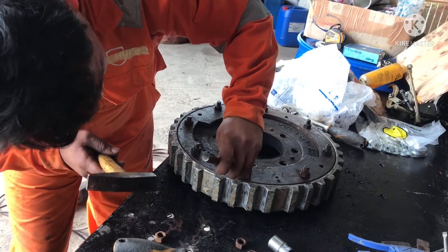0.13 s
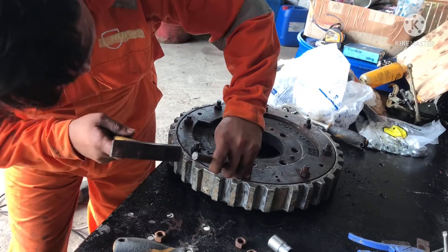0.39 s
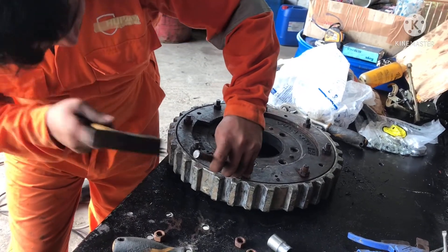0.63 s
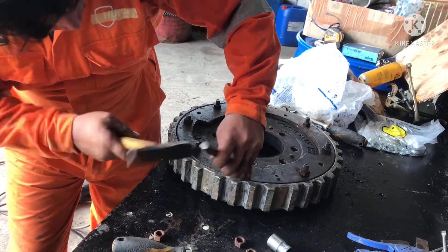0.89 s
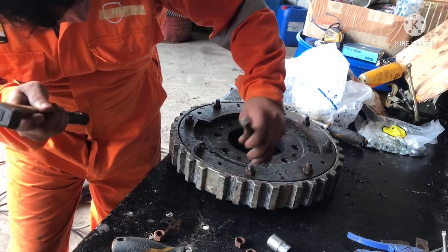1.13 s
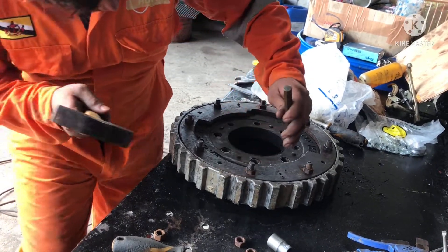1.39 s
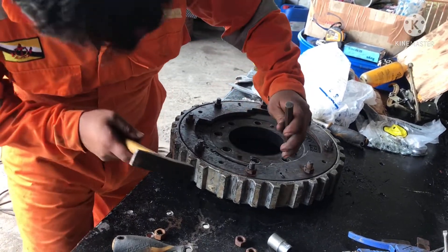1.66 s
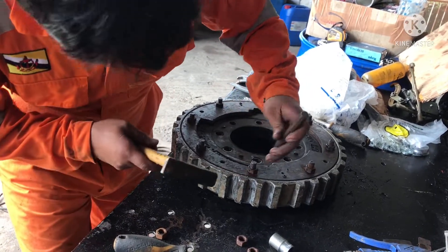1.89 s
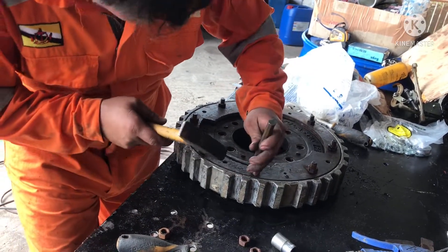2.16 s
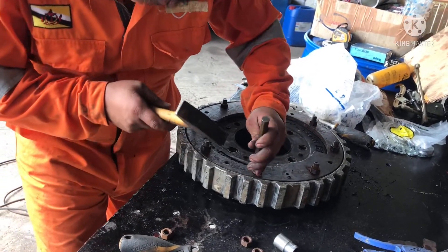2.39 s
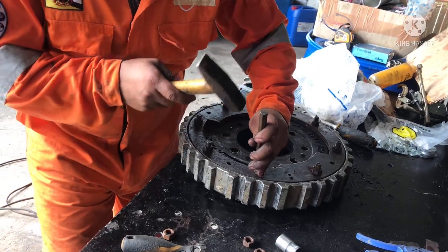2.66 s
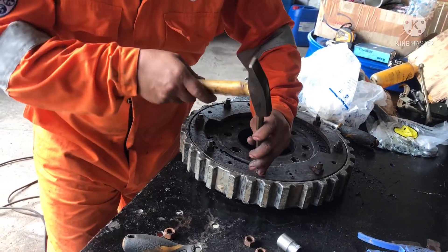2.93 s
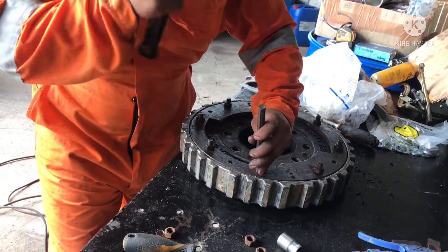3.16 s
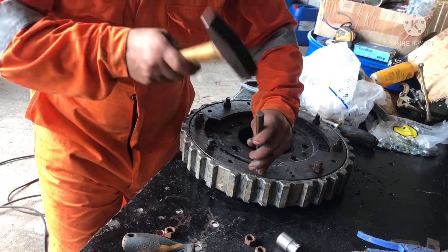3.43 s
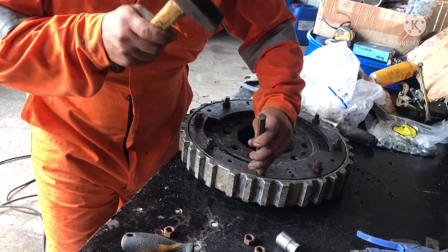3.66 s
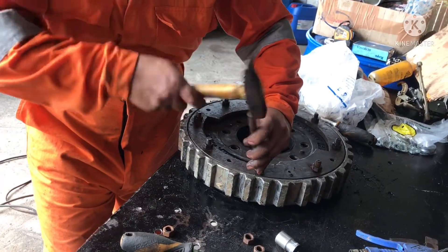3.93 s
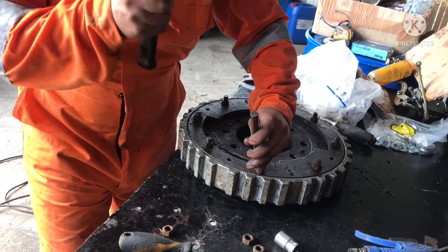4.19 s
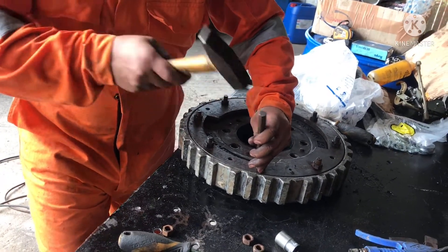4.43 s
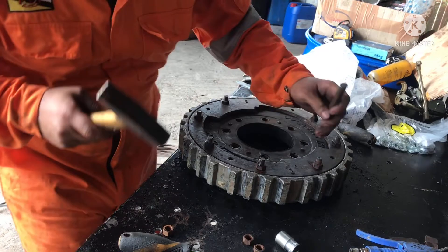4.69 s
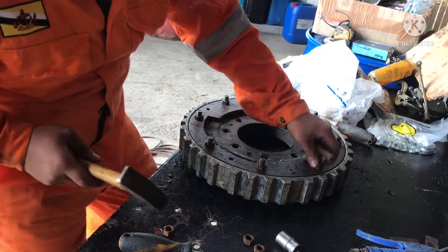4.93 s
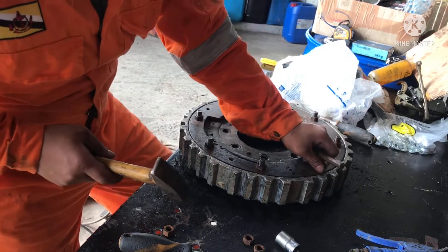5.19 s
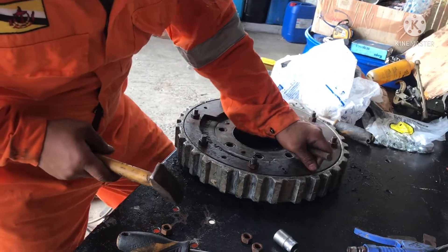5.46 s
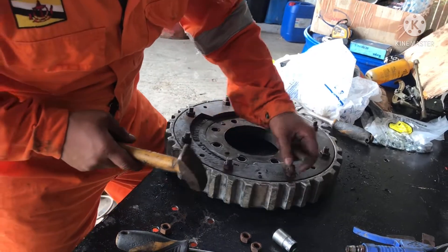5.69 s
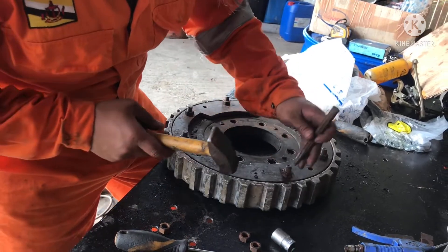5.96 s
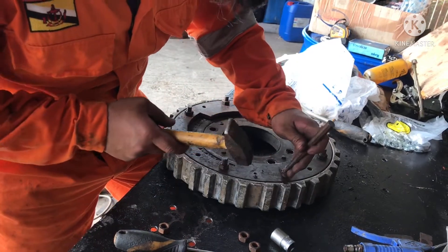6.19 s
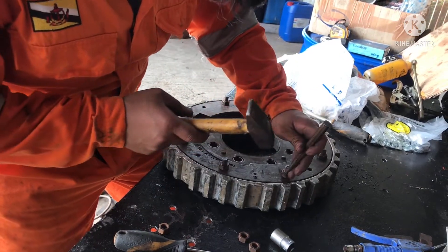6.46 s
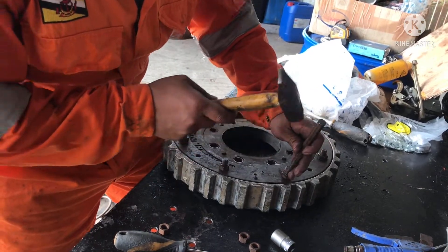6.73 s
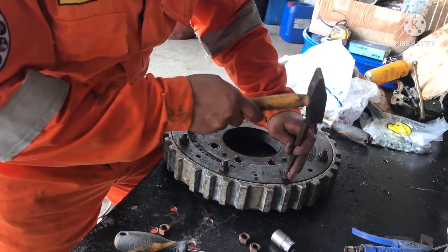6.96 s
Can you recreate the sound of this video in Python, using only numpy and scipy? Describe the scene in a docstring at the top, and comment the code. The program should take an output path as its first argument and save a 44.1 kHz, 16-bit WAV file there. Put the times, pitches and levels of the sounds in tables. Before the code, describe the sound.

Close hammering on steel in an open workshop with quick echoes and a tail of about half a second. Soft tool and cloth brushes come first, with a faint buzzy bird note and slurred whistle. At 0.5 s a light, bright tap; at 0.9 s a hard crack with a short clang, high ping and low bench thud. Small brushes near 1.5 s and 2.3 s, faint falling chirps at 1.9 and 2.7. A light tap at 3.0 leads to very loud, clipped blows at 3.3, 4.0 and 4.3 s. From 5.35 to about 5.8 the gear is dragged, knocking and rumbling; the bird call repeats. Faint chirps, short far tones and tiny ticks follow, then a light tap at 7.0. Low yard hum continues, with a distant engine throb strongest before 2 s, and barely audible whine and insects.

```python
"""A hammer strikes a steel punch set on a heavy gear lying on a steel bench: light aiming taps and hard blows.
Each blow is shaped noise (crack, clang) plus dying modes of punch, gear and bench; the loudest ones clip.
Between blows the gear is dragged round, random slips knocking the bench modes, and tools and cloth brush steel.
Sparse echoes and a banded tail answer as the open workshop; outside, gliding tones make bird calls and
far tones, and filtered noise makes yard hum, a distant engine, a whine and insects."""
import sys
import numpy as np
from scipy import signal
from scipy.fft import rfft, irfft
from scipy.io import wavfile
from scipy.ndimage import uniform_filter1d

SR = 44100
rng = np.random.default_rng(int(sys.argv[2]) if len(sys.argv) > 2 else 0)


def log_audio(samples):
    """Write samples as a 16-bit WAV file to the path given in sys.argv[1]."""
    # one column per channel
    frames = np.atleast_2d(samples).T
    # limit to full scale, then quantise
    limited = np.clip(frames, -1, 1)
    pcm = np.round(limited * 32767).astype(np.int16)
    wavfile.write(sys.argv[1], SR, pcm)


def gain_from_db(level_db):
    """Convert decibel levels to linear amplitude factors (20 dB per decade)."""
    decades = np.asarray(level_db, float) / 20
    return 10 ** decades


N = 312669


def evened(x):
    """Scales to rms 1."""
    return x / np.sqrt(np.mean(x ** 2) + 1e-20)


def read(points, hz):
    """Reads a curve on a log-frequency axis."""
    point_hz, value = np.transpose(points)
    return np.interp(np.log(hz + 1), np.log(point_hz + 1), value)


def add(mix, start_s, sound):
    """Adds a sound at a time, cut at the end of the mix."""
    part = mix[round(start_s * SR):][:len(sound)]
    part += sound[:len(part)]


def coloured(x, db_of_hz):
    """Filters a signal by a gain rule, rms 1."""
    gain = gain_from_db(db_of_hz(np.fft.rfftfreq(len(x), 1 / SR)))
    return evened(irfft(rfft(x) * gain, len(x)))


def ring(t, hz, t60, db, rise_s):
    """Sum of dying modes with a soft start; neighbours swing in opposite sense."""
    hz, t60, db = (np.reshape(c, (-1, 1)) for c in (hz, t60, db))
    sense = (-1.) ** np.arange(len(hz))[:, None]
    modes = sense * gain_from_db(db - 60 * t / t60) * np.sin(2 * np.pi * hz * t)
    return modes.sum(0) * (1 - np.exp(-t / rise_s))


# blows: start_s, strength_db, bright_db_per_octave, thud_db, low_punch_db, high_punch_db
BLOWS = [(0.5409, -21.5, 2, -6, -5, -4), (0.9235, -1, 0, -4, 4, 8.5), (2.9725, -19.5, -3.5, -9, -9, -9.5),
         (3.344, 0, -1.5, -0.5, -7, 9.5), (3.964, 1.5, -2, -1.5, -3.5, -8.5),
         (4.339, 2.5, -0.95, -2, -4, -9.5), (7.012, -21.5, 0.5, 1, -23, -14.5)]


def hammer_blows():
    """All blows, as the microphone and as the walls receive them."""
    direct, walls = np.zeros((2, N))
    for row in BLOWS:
        to_microphone, to_walls = blow(*row)
        add(direct, row[0], to_microphone)
        add(walls, row[0], to_walls)
    return direct, walls


# the punch stands on three spots in turn, a hand grips the gear at each end: end_s
SPOT_ENDS_S = [2, 5.35, 8]
RING_TO_WALLS_DB = -2  # modes radiate unevenly, the walls get less of them


def blow(start_s, strength_db, bright_db, thud_db, low_db, high_db):
    """Steel on steel excites crack and clang, then punch, gear and bench modes."""
    spot = np.searchsorted(SPOT_ENDS_S, start_s)
    end_s = min(SPOT_ENDS_S[spot], N / SR)
    t = np.arange(round((end_s - start_s) * SR)) / SR
    light = np.clip(-strength_db / 15, 0, 1)  # 0 hard blow, 1 light tap

    def colour_db(f):
        return strike_colour_db(f, light, bright_db)

    direct_crack, spread_crack = crack(light, colour_db)
    dense = clang(light, colour_db)
    modes = punch(t, light, low_db, high_db) + gear(t, spot)
    sound = modes * gain_from_db(np.array([[0], [RING_TO_WALLS_DB]])) + bench(t, thud_db)
    add(sound[0], 0, (direct_crack + dense)[:len(t)])
    add(sound[1], 0, (spread_crack + dense)[:len(t)])
    return gain_from_db(strength_db) * sound * np.minimum((t[-1] - t) / 0.022, 1)


# broad ring of the hammer head on a light tap: centre_hz, width_hz, gain_db
HEAD = [(3650, 1100, 14), (9300, 1200, 7)]


def strike_colour_db(f, light, bright_db):
    """Spectral tilt of a strike plus head ring, which a hard blow chokes."""
    head_db = sum(db * np.exp(-((f - hz) / width_hz) ** 2) for hz, width_hz, db in HEAD)
    return light * head_db + bright_db * np.log2((f + 1) / 2000)


# steel on steel: freq_hz, level_db_per_hz (relative)
CRACK = [(180, -21), (300, 8), (511, -8.5), (1080, -4.5), (1970, -9), (2280, -9), (5080, -17), (7080, -13),
         (8940, -20), (12300, -24.5), (16000, -27.5)]
CONTACT_S, LIGHT_CONTACT_S = .0017, .002  # first touch to crack peak: hard blow, light tap
LIGHT_CRACK_DB = 4  # a light tap is all surface, its crack stands out
SPREAD_DB = -0.26  # click energy to the walls, over that of the hump


def crack(light, colour_db):
    """Noise burst as the contact builds and lets go; a compact click goes to the walls."""
    t = np.arange(16384) / SR

    def spectrum_db(f):
        return read(CRACK, f) + colour_db(f)

    contact = t / (CONTACT_S + light * (LIGHT_CONTACT_S - CONTACT_S))
    hump = gain_from_db(0.5) * (contact * np.exp(1 - contact)) ** (1 + light)
    noise = coloured(rng.standard_normal(len(t)), spectrum_db)
    direct = gain_from_db(LIGHT_CRACK_DB * light) * hump * noise
    # summed over all directions the crack is even
    click = coloured(signal.unit_impulse(len(t), idx=300), spectrum_db)
    click *= np.exp(-((t - t[300]) / .003) ** 2)
    spread = gain_from_db(SPREAD_DB) * np.linalg.norm(hump) / np.linalg.norm(click) * click
    return direct, spread


# countless close modes: freq_hz, level_db_per_hz (relative)
CLANG = [(240, -37.5), (400, -6.5), (826, -5.5), (906, -11.5), (1030, -2.5), (1250, -12.5), (1760, -9.5),
         (2600, -14.5), (2950, -20.5), (4950, -28), (7060, -27.5), (12300, -36.5), (16000, -42)]


def clang(light, colour_db):
    """Modes too dense to part, as noise that swells fast and dies with a 0.18 s T60."""
    t = np.arange(16384) / SR
    swell = (1 - np.exp(-t / 0.0021)) * gain_from_db(-7.5 - 4 * light - 60 * t / 0.18)
    noise = rng.standard_normal(len(t))
    return swell * coloured(noise, lambda f: read(CLANG, f) + .6 * colour_db(f))


# punch modes: freq_hz, t60_s, level_db (before the blow's ring levels)
PUNCH = [(7185, 0.059, -17.5), (7420, 0.029, -18.5), (9900, 0.04, -21.5), (12020, 0.025, -15),
         (12280, 0.044, -20.5)]
# borders of low, middle and high ring: split_hz
PUNCH_SPLIT_HZ = [9000, 11000]
MIDDLE_TRADE = .6  # dB the middle ring gains per dB the high ring loses
# hammer face on a light tap: freq_hz, t60_s, level_db
PING = ([3207, 3900], [.005, 0.0057], [4, 5])


def punch(t, light, low_db, high_db):
    """Short high modes of the punch, and the hammer face pinging on a light tap."""
    hz, t60_s, db = np.transpose(PUNCH)
    middle_db = -MIDDLE_TRADE * high_db - 14 * light
    grip_db = np.choose(np.searchsorted(PUNCH_SPLIT_HZ, hz), [low_db, middle_db, high_db])
    return ring(t, hz, t60_s, db + grip_db, 0.00087) + light * ring(t, *PING, .0015)


# gear modes: freq_hz, t60_s (before the grip limit), spot1_db, spot2_db, spot3_db
GEAR = [(344, 4.4, -53.5, -42, -45), (486, 1, -37.5, -32.5, -44), (539, 0.95, -42.5, -34.5, -40),
        (604, 0.97, -40, -44, -39), (648, 0.093, -11, -8.5, -6), (721, 0.064, -6.5, -10, -12),
        (832, .07, -6, -11, -14), (890.2, .07, -13.5, -8, -6), (1009, 0.082, -4, -10, -21),
        (1060, 0.18, -13.5, -9.5, -25.5), (1358, 0.049, -15, -8.5, -14.5), (1391, 0.048, -6.5, -13, -22),
        (1638, .06, -12.5, -12, -20), (1755, 0.085, -13, -8, -7), (2250, .03, -5, -15.5, 2),
        (2644, .025, -8, -9, 9.5), (370, 0.045, -27, -17.5, 8)]
RIM_TOP_HZ, GRIP_T60_S = 625, .085  # free rim modes lie below; above, the hand limits the ring


def gear(t, spot):
    """Gear modes, weighted by the spot struck; rim modes ring free, the rest is held in the hand."""
    hz, t60_s, *spot_db = np.transpose(GEAR)
    t60_s = np.where(hz < RIM_TOP_HZ, t60_s, np.minimum(t60_s, GRIP_T60_S))
    return ring(np.maximum(t - .0015, 0), hz, t60_s, spot_db[spot], 0.0012)


# bench modes, reshaped by drag(): freq_hz, t60_s, level_db (relative)
BENCH = [(90.5, 0.19, -4), (110.2, 0.37, -2.5), (95.2, 1.1, -30.5), (103.4, 1.2, -28), (150, 0.15, -10.5),
         (251.3, 0.084, -4), (288, 0.18, -9), (321, 0.059, -10.5), (405.9, 0.085, -11), (64, .08, -8)]


def bench(t, thud_db):
    """The blow travels through the gear and sets off the bench 3 ms late."""
    late_s = np.maximum(t - .003, 0)
    return gain_from_db(thud_db + 1.0) * ring(late_s, *np.transpose(BENCH), 0.0051)


# the gear is dragged round in two pulls: start_s, hold_s, rumble_db, grit_db (over rumble_db)
PULLS = [(5.352, .03, -36, -25), (5.481, .21, -34, -19)]
# a tooth catches hard: start_s, peak_db
CATCHES = [(5.354, -34), (5.505, -25.5), (5.554, -27), (5.584, -29.5), (5.693, -39), (5.834, -47)]
PULL_ATTACK_S, PULL_RELEASE_DB_PER_S = .015, 147
SLIDE_S, SLIDE_DB = 0.15, -2  # time to slide freely, level of the whole bench rumbling


def drag():
    """Gear teeth catch and slip, knocking the damped low modes of the bench."""
    start_s = PULLS[0][0]
    t = start_s + np.arange(SR * 2 // 3) / SR
    is_slip = rng.random(len(t)) < 150 / SR  # 150 slips per second on average
    slip_size = gain_from_db(2.8 * rng.exponential(1, len(t)))
    slips = is_slip * slip_size * rng.choice([-1, 1], len(t))
    rub = evened(slips) + .5 * rng.standard_normal(len(t))

    hz, _, db = np.transpose(BENCH)
    mode_t = t[:3000] - start_s
    body = ring(mode_t, hz, 0.058, 0.17 * db - 4 * (hz < 200), 0.0022)
    deep = ring(mode_t, hz, 0.094, .22 * db - 14 * (hz > 200), .002)
    knock = gain_from_db(-6.5) * evened(signal.oaconvolve(rub, body)[:len(t)])
    rumble = evened(signal.oaconvolve(rub, deep)[:len(t)])
    grit_curve = [(300, -21.0), (600, 1.5), (1300, -8.5), (2500, -18.0), (9000, -32.0)]  # Hz, dB
    grit_noise = 0.72 * rub + rng.standard_normal(len(t))
    grit = coloured(grit_noise, lambda f: read(grit_curve, f))

    sound = np.zeros(len(t))
    for pull_s, hold_s, rumble_db, grit_db in PULLS:
        sliding = np.clip((t - pull_s) / SLIDE_S, 0, 1) ** 2
        release_db = PULL_RELEASE_DB_PER_S * np.maximum(t - pull_s - hold_s, 0)
        level = np.clip((t - pull_s) / PULL_ATTACK_S, 0, 1) * gain_from_db(rumble_db - release_db)
        bench_sound = (1 - .5 * sliding) * knock + gain_from_db(SLIDE_DB) * sliding * rumble
        sound += level * (bench_sound + gain_from_db(grit_db) * grit)
    for catch_s, peak_db in CATCHES:
        add(sound, max(catch_s - start_s, 0), gain_from_db(peak_db) * body / abs(body).max())
    return start_s, sound


def tick(level_db, hz):
    """A short dull knock of two modes inside a soft brush of noise."""
    t = np.arange(4000) / SR
    brush = coloured(rng.standard_normal(len(t)), lambda f: -6.5 * np.log2((f + 600) / 1000))
    brush *= gain_from_db(-8.5 - 60 * t / 0.14) * (1 - np.exp(-t / 0.0013))
    knock = ring(t, hz * np.array([1, 1.7]), [0.037] * 2, [-5, -14], 0.001)
    return gain_from_db(level_db) * (knock + brush)


# tools and cloth brushing steel: start_s, level_db, knock_hz
TICKS = [(0.034, -42, 816), (0.19, -41, 1430), (0.211, -38, 810), (1.431, -50, 604), (1.521, -39, 2197),
         (1.557, -35.5, 905), (1.575, -38.5, 1280), (2.293, -46.5, 840), (4.819, -41.5, 1030),
         (5.773, -45, 762), (6.242, -46.5, 2280), (6.572, -51, 2250)]


def ticks():
    """All brushes of tools and cloth on steel."""
    out = np.zeros(N)
    for start_s, level_db, hz in TICKS:
        add(out, start_s, tick(level_db, hz))
    return out


# single echoes off bench top, floor, walls: delay_s, level_db (relative)
ECHOES = [(.0062, -9), (.0128, -2.5), (0.022, -15), (.032, -12), (0.047, -12.5)]
# tail decay: freq_hz, t60_s
HALL = [(100, 0.8), (300, .5), (1000, 0.57), (3000, 0.55), (7000, 0.43), (14000, 0.37)]


def hall():
    """A few single echoes, and sparse taps of random sign, each band dying at its own speed."""
    taps = np.zeros(SR)
    at = np.arange(400, SR - 20, 20)
    taps[at + rng.integers(0, 20, len(at))] = rng.choice([-1., 1.], len(at))
    hz, t, bands = signal.stft(taps, SR, nperseg=512)
    leak_db = read([(90, -16.0), (200, -1), (500, -5)], hz)[:, None]  # bass escapes by the open sides
    decay_db = -60 * t / read(HALL, hz)[:, None]
    tail = signal.istft(bands * gain_from_db(leak_db + decay_db), SR, nperseg=512)[1]
    early = np.zeros(len(tail))
    for delay_s, db in ECHOES:
        early[round(delay_s * SR)] = gain_from_db(db)
    return early, tail / np.linalg.norm(tail)


def tone(hz, level_db, partials=((1, 0),)):
    """A tone along a pitch curve with soft ends; partials are (number, dB)."""
    turns = np.cumsum(hz) / SR
    wave = sum(gain_from_db(db) * np.sin(2 * np.pi * k * turns) for k, db in partials)
    return np.sqrt(2) * gain_from_db(level_db) * wave * signal.windows.tukey(len(hz), .4)


# first part of a two-part bird call: start_s, pitch_hz, level_db
BUZZES = [(0.04, 1755, -61.5), (5.485, 1801, -58.5)]


def bird_buzzes():
    """A buzzy note: randomly wobbling pitch, partials 2 to 4 only."""
    out = np.zeros(N)
    for start_s, hz, level_db in BUZZES:
        noise = uniform_filter1d(rng.standard_normal(SR // 5), size=200)
        wobble = 1 + 0.23 * noise[:round(0.055 * SR)]
        add(out, start_s, tone(hz * wobble, level_db, ((2, -6.5), (3, -2), (4, -10.0))))
    return out


# second part of the call: start_s, length_s, level_db (at its start)
WHISTLES = [(.15, 0.17, -52), (5.595, .14, -51.5)]
SLUR_START_HZ, SLUR_TOP_HZ, SLUR_END_HZ = 3050, 4320, 3550
SLUR_RISE, SLUR_HOLD = .45, .7  # shares of the length at which rise and hold end
SLUR_FADE_DB = -17


def bird_whistles():
    """A fading, warbling whistle that slurs up, holds and drops."""
    out = np.zeros(N)
    for start_s, length_s, level_db in WHISTLES:
        u = np.linspace(0, 1, round(length_s * SR))
        up = np.clip(1 - u / SLUR_RISE, 0, 1)
        down = np.clip((u - SLUR_HOLD) / (1 - SLUR_HOLD), 0, 1)
        hz = SLUR_TOP_HZ - (SLUR_TOP_HZ - SLUR_START_HZ) * up ** 1.6
        hz -= (SLUR_TOP_HZ - SLUR_END_HZ) * down
        warble = 1 + 0.014 * np.sin(2 * np.pi * 150 * u * length_s)
        add(out, start_s, tone(hz * warble, level_db + SLUR_FADE_DB * u ** 2))
    return out


# second bird: start_s, level_db (before its direct and hall shares)
CHIRPS = [(1.9, -63), (2.692, -62.5), (5.195, -62), (6.416, -62)]
CHIRP_S, CHIRP_START_HZ, CHIRP_END_HZ = .055, 5100, 3200


def bird_chirps():
    """Falling chirps, roughened by fast random pitch."""
    out = np.zeros(N)
    for start_s, level_db in CHIRPS:
        u = np.linspace(0, 1, round(CHIRP_S * SR))
        rasp = 1 + 0.37 * uniform_filter1d(rng.standard_normal(SR // 5), size=60)[:len(u)]
        hz = CHIRP_END_HZ + (CHIRP_START_HZ - CHIRP_END_HZ) * (1 - u)
        add(out, start_s, tone(hz * rasp, level_db))
    return out


# short faint tones from far off: start_s, length_s, pitch_hz, level_db
FAR_TONES = [(5.264, 0.14, 1628, -75), (5.89, 0.041, 990, -65), (5.97, 0.043, 1193, -62),
             (6.298, 0.08, 1201, -64), (6.527, 0.065, 995, -65), (6.605, 0.047, 1204, -65)]


def far_tones():
    """Steady sines with soft ends."""
    out = np.zeros(N)
    for start_s, length_s, hz, level_db in FAR_TONES:
        add(out, start_s, tone(np.full(round(length_s * SR), float(hz)), level_db))
    return out


def outdoors():
    """Bird calls and far tones, as they arrive straight and as they enter the hall."""
    calls, chirps = bird_buzzes() + bird_whistles() + far_tones(), bird_chirps()
    near_db = 6  # the chirping bird sits closer, more of it arrives straight
    return calls + gain_from_db(near_db) * chirps, calls + gain_from_db(-near_db) * chirps


def narrow(hz, width_hz):
    """Noise in a narrow band, rms 1."""
    noise = rng.standard_normal(N)
    return coloured(noise, lambda f: -20 * np.log10(1 + (2 * (f - hz) / width_hz) ** 2))


# distant throb: time_s, level_db
ENGINE = [(0.0, -54), (.2, -44), (1.9, -45.5), (2.7, -61), (5.4, -63), (5.9, -53.5), (7.09, -62)]


def engine():
    """Narrow noise at 63 Hz whose level comes and goes."""
    level_db = np.interp(np.arange(N) / SR, *np.transpose(ENGINE))
    return gain_from_db(level_db) * narrow(63, 6.4)


# whine: pitch_hz, level_db, width_hz
WHINE = [(604, -72.5, 4.6), (1160, -76, 10)]


def whine():
    """Steady narrow bands of noise."""
    return sum(gain_from_db(db) * narrow(hz, width_hz) for hz, db, width_hz in WHINE)


# insects: pitch_hz, level_db (before pulsing), width_hz
INSECTS = [(7980, -80.5, 140), (8420, -82, 160)]


def insects():
    """Narrow high bands pulsing together at 15.5 Hz."""
    pulse = 1 + .6 * np.sin(2 * np.pi * 15.5 * np.arange(N) / SR)
    return pulse * sum(gain_from_db(db) * narrow(hz, width_hz) for hz, db, width_hz in INSECTS)


# yard hum: freq_hz, level_db_per_hz (relative)
AIR = [(12, -42.5), (20, -23), (39, -0.5), (63, 2), (93, -3.5), (182, -12.5), (446, -23), (607, -26),
       (718, -24), (1190, -26), (2750, -37.5), (4060, -40.5), (7520, -46), (8180, -47), (16000, -52.5)]


def yard_hum():
    """Broad noise whose spectrum drifts in patches of time and frequency."""
    frames, hz = N // 512 + 5, np.fft.rfftfreq(2048, 1 / SR)
    real, imag, patches = rng.standard_normal((frames, 1025, 3)).T
    patches = uniform_filter1d(patches, size=20, axis=0)
    patches = evened(uniform_filter1d(patches, size=8, axis=1))
    bands = (real + 1j * imag) * gain_from_db(read(AIR, hz)[:, None] + 0.45 * patches)
    return gain_from_db(-47) * evened(signal.istft(bands, nperseg=2048, noverlap=1536)[1][:N])


def scene():
    """Near sounds get echoes and tail; far ones are mostly tail."""
    handling = ticks()
    add(handling, *drag())
    direct_blows, wall_blows = hammer_blows()
    near, walls = handling + direct_blows, handling + wall_blows
    straight, far = outdoors()
    early, tail = hall()
    echoes = gain_from_db(-8.5) * signal.oaconvolve(near, early)
    reverb = signal.oaconvolve(gain_from_db(-11) * walls + gain_from_db(2.0) * far, tail)
    air = yard_hum() + engine() + whine() + insects()
    return (gain_from_db(-2.0) * near + gain_from_db(-8) * straight + (echoes + reverb)[:N] + air)[None]


def roll_off(x):
    """The treble ends steeply here."""
    return signal.sosfilt(signal.butter(12, 16260, fs=SR, output="sos"), x)


def record(dry):
    """The microphone drops the deepest bass, the converter clips the loudest blows."""
    high_pass = signal.butter(2, 45, "high", fs=SR, output="sos")
    thinned = signal.sosfilt(high_pass, dry)
    return roll_off(np.clip(thinned, -1, 1))


dry = scene()
out = record(dry)
log_audio(out)
```